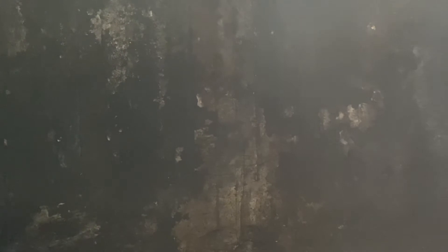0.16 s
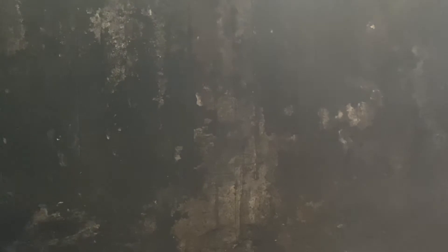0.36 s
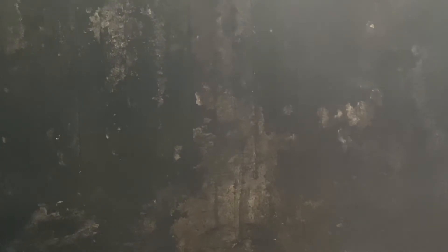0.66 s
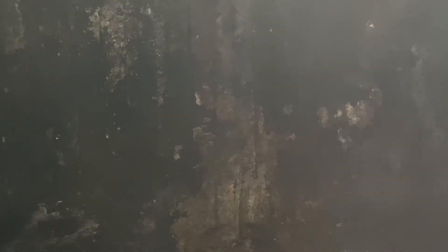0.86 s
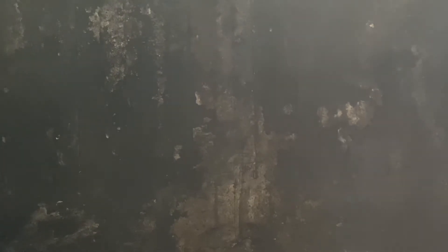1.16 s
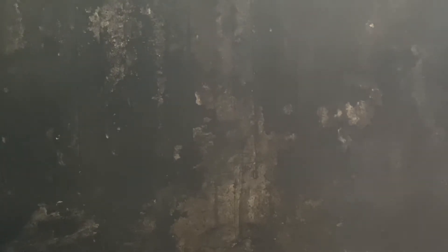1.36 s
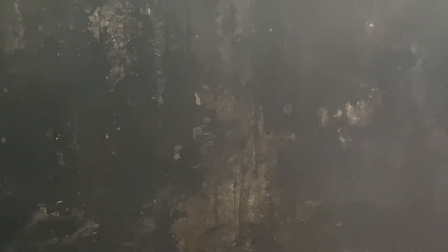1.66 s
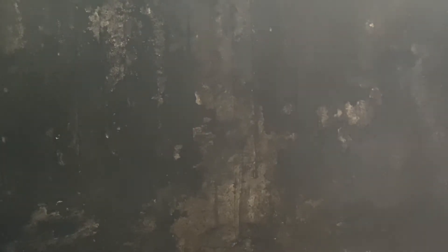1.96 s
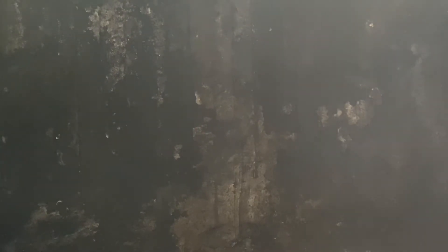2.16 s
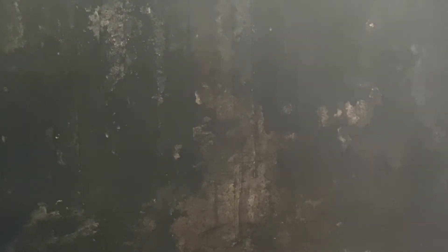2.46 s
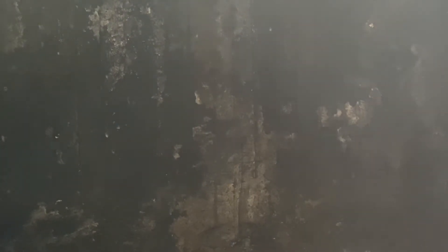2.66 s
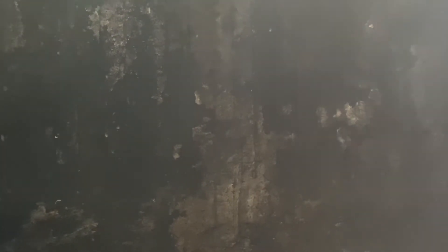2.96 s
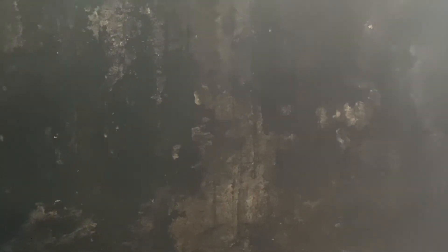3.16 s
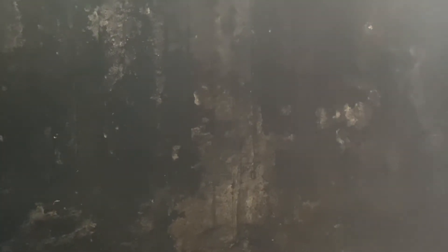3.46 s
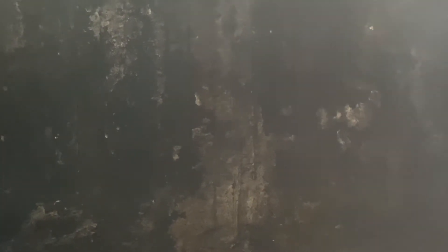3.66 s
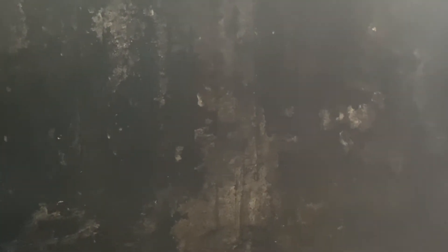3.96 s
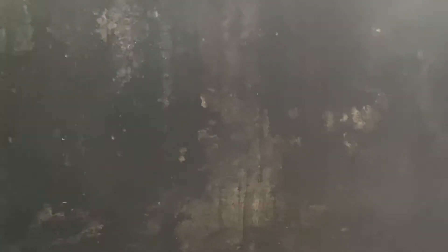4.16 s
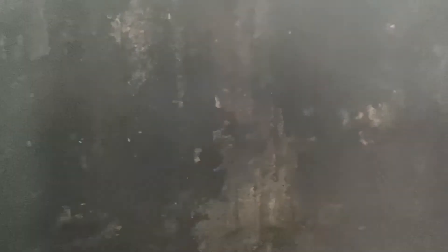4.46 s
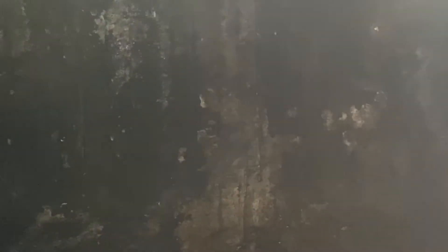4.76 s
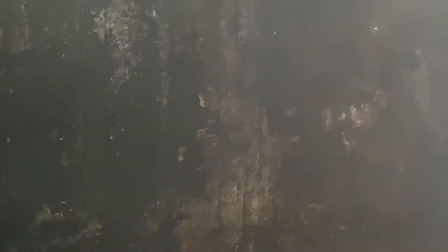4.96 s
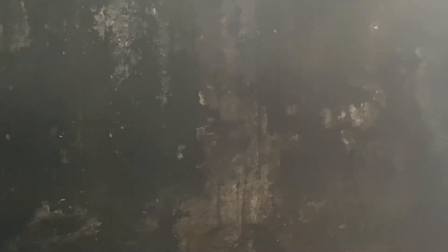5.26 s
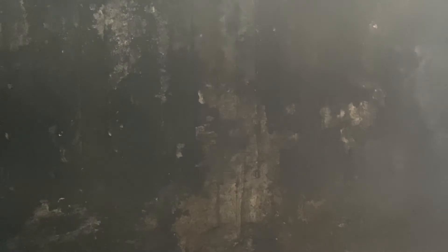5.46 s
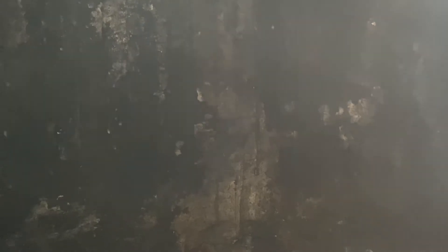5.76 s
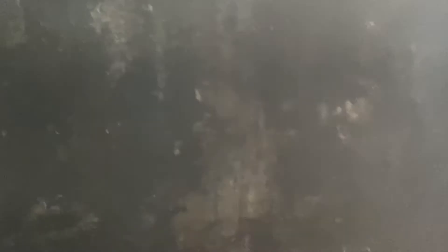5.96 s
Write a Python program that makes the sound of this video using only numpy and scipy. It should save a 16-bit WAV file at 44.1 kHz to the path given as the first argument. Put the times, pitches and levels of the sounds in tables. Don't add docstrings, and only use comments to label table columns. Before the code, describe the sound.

Inside a rolling subway car, a steady low rumble with soft hiss and faint motor whine, broken by one hard, loud double-bouncing knock on glass.

```python
import sys
import numpy as np
from scipy import signal
from scipy.fft import rfft, irfft
from scipy.io import wavfile

SR = 44100
rng = np.random.default_rng(int(sys.argv[2]) if len(sys.argv) > 2 else 0)


def master(y):
    cut = np.clip(np.atleast_2d(y).T, -1, 1)
    pcm = np.round(cut * 32767)
    wavfile.write(sys.argv[1], SR, pcm.astype(np.int16))


def undo_db(level):
    steps = np.asarray(level, float) / 20
    return 10 ** steps


N = 269890

# f/Hz, likeness/0-1, right leads/rad, left louder/dB
PORTS_HIGH = [(1480, 0.23, -0.13, 2.3), (2210, 0.73, -0.64, 8.9), (2880, 0.8, -0.39, 5.3),
              (4080, 1, -0.55, 6.7), (5930, 0.39, .05, 6.1), (7050, 1, 0.15, 0.55),
              (16000, 0.84, -0.15, .01)]


def at_hz(points, hz):
    at, *columns = np.transpose(points)
    return [np.interp(np.log(hz + 1), np.log(at), column) for column in columns]


def right_port(ports, hz):
    alike, lead, left_db = at_hz(ports, hz)
    lag_s, lag_from_hz = 0.00025, 7030
    lead = lead + 2 * np.pi * lag_s * np.maximum(hz - lag_from_hz, 0)
    return np.clip(alike, 0, 1), np.exp(1j * lead) * undo_db(-left_db)


def rms_one(x):
    return x / np.sqrt(np.mean(x ** 2) + 1e-20)


def drift(rate_hz):
    hop = 40
    r = np.exp(-2 * np.pi * rate_hz * hop / SR)
    settle = 2000
    noise = rng.standard_normal(N // hop + settle + 2)
    slow = signal.lfilter([1], [1, -2 * r, r * r], noise)[settle:]
    return np.interp(np.arange(N) / hop, np.arange(len(slow)), rms_one(slow))


def ring(x, hz, r):
    w = 2 * np.pi * hz / SR
    return signal.lfilter([0, np.sin(w)], [1, -2 * r * np.cos(w), r * r], x + 1e-18)


def port_noise(spectrum, ports, low_hz, high_hz):
    hz = np.arange(N // 2 + 1) * SR / N
    shared, own = rfft(rng.standard_normal((2, N)))
    alike, turn = right_port(ports, hz)
    right = (alike * shared + np.sqrt(1 - alike ** 2) * own) * turn
    in_band = (hz >= low_hz) * (hz < high_hz)
    colour = undo_db(at_hz(spectrum, hz)[0]) * in_band
    return rms_one(irfft(colour * np.array([shared, right]), N))


def nearness():
    swing_from_s, nearest_s, leaves_s, clear_s = 4.1, 4.25, 4.62, 4.75
    return np.interp(np.arange(N) / SR, [swing_from_s, nearest_s, leaves_s, clear_s], [0, 1, 1, 0])


def rumble(near):
    # f/Hz, density/dB per Hz
    rolling = [(24, -20.6), (34, -31), (45, -8), (65, -7), (110, -0.5), (200, -1.5), (330, -1.5), (380, -4),
               (480, -4), (540, -8), (680, -5), (800, -11.5), (1100, -11), (1500, -15)]
    # f/Hz, likeness/0-1, right leads/rad, left louder/dB
    ports_low = [(60, 1, .1, 3.5), (202, 0.86, 0.078, -0.9), (335, 0.78, 0.18, 3), (440, 0.61, 1.9, 3),
                 (623, 0.1, 2.5, 2.5), (770, 0.47, 2.74, -0.2), (1010, 0, 2.5, 0.5),
                 (1370, 0.73, 1.72, 1.5)]
    level_db, shade_db, swell_db = -24, 1.5, 1.0
    level = undo_db(level_db - shade_db * near + swell_db * drift(1.7))
    return level * port_noise(rolling, ports_low, 12, 1500)


def hiss(near):
    # f/Hz, density/dB per Hz
    airy = [(1500, -0.5), (1900, 0.7), (2150, -1), (2450, -0.2), (3000, -5.5), (3700, -7.5), (4200, -14.5),
            (4900, -14.5), (5600, -20.5), (7000, -26), (9000, -35.5), (11500, -39.5), (13300, -54),
            (15100, -53)]
    level_db, swell_db, top_hz = -34, 0.42, 15150
    shade_db = np.outer([3, 1.5], near)
    level = undo_db(level_db - shade_db + swell_db * drift(5.2))
    return level * port_noise(airy, PORTS_HIGH, 1500, top_hz)


def body():
    # f/Hz, width/Hz, left level/dB, right level/dB
    resonances = [(68.2, 9.7, -33, -39), (110.3, 34, -34.5, -36.5), (166, 7.6, -36, -38),
                  (221.2, 8.2, -37, -38), (282.5, 17, -38, -42), (335.9, 19.8, -31, -37),
                  (455, 15.4, -37, -53), (600, 61, -43.5, -48.5), (869, 69, -47.5, -47),
                  (903, 16, -48, -42), (2470, 4.2, -76, -74), (2744, 25, -55, -54)]
    axle_hz, axle_db = 34, -40.5
    axle = undo_db(axle_db) * np.sqrt(2) * np.sin(2 * np.pi * axle_hz * np.arange(N) / SR)
    out = axle * undo_db([[1.0], [-1.0]])
    for hz, width, left_db, right_db in resonances:
        r = np.exp(-np.pi * width / SR)
        rung = ring(ring(rng.standard_normal(N), hz, r), hz, r)
        out = out + undo_db([[left_db], [right_db]]) * rms_one(rung)
    return out


def motors(waver_db, wander_rad):
    orders = (21, 22, 39, 41, 42, 43, 44, 45, 59, 60, 61, 62)
    # left level/dB, right level/dB, right leads/rad
    whine = [(-43, -57, -0.52), (-54, -49, -1.3), (-73, -60, 0.51), (-66, -69, 0.42), (-68, -61.5, .3),
             (-73, -72, -0.76), (-85, -78, -1.5), (-80, -76, .1), (-79, -78, -.4), (-81, -77, -.2),
             (-73, -68, 0.54), (-79, -79, .01)]
    gear_hz = (4862, 4952, 5134, 5857, 6308, 8110, 15000)
    # left level/dB, right level/dB, right leads/rad
    gears = [(-62, -72, -.7), (-70, -73, 0.073), (-72, -77, .3), (-78, -81, -.1), (-75, -80, -.1),
             (-75, -77, 1.6), (-91, -91, .01)]
    motor_hz = 112.01
    pitches = [k * motor_hz for k in orders] + list(gear_hz)
    out = np.zeros((2, N))
    for hz, (left_db, right_db, lead) in zip(pitches, list(whine) + list(gears)):
        phase = 2 * np.pi * (hz * np.arange(N) / SR + rng.random()) + wander_rad * drift(1.9)
        level = undo_db([[left_db], [right_db]]) * undo_db(waver_db * drift(0.83))
        out += level * np.sqrt(2) * np.sin(phase + [[0], [lead]])
    return out


def jolts():
    # t/s, f/Hz, peak level/dB, length/s
    sways = [
        (2.762, 55, -21, 0.028),
        (3.512, 76.5, -17.5, 0.034),
        (3.546, 60, -18, .04),
        (4.03, 48, -24, 0.066),
        (4.4876, 473, -13, 0.0036),
        (5.938, 58, -12, 0.026),
        (5.967, 45, -22, 0.046),
    ]
    t = np.arange(N) / SR
    out = 0
    for s, hz, db, length in sways:
        bell = np.exp(-((t - s) / length * 2) ** 2)
        out = out + undo_db(db) * bell * np.cos(2 * np.pi * hz * (t - s))
    return out


def bending_waves(lag_s, soft_s):
    knock_s = [
        4.4848,
        4.4894,
        4.5386,
        4.568,
    ]
    knock_db = (-21, 3, -7, -15.5)
    out, age = np.zeros(N), np.arange(1, 4001) / SR
    turns = np.log(age / .00278) / np.log(1.95)
    onset = 1 - np.exp(-(age / soft_s) ** 3)
    fall = np.exp(-(age / .0135) ** 3) + .33 * np.exp(-(age / .034) ** 6)
    wave = onset * fall * np.cos(2 * np.pi * turns)
    for s, db in zip(knock_s, knock_db):
        i = round((s + lag_s) * SR)
        out[i:i + 4000] += undo_db(db) * wave
    return out


def contacts():
    # t/s, peak level/dB, length/ms, dullness/dB per octave
    touches = [
        (4.4912, -20, 0.16, 0),
        (4.4919, -17, 0.12, -2.1),
        (4.495, -39, .5, 6),
        (4.4986, -26, 0.18, 1.0),
        (4.5413, -16.5, .15, .6),
        (4.5525, -46, .3, -1.5),
        (4.568, -37, 0.18, .5),
        (5.908, -46, .2, -4.0),
    ]
    # f/Hz, level/dB, t60/s
    modes = [(1830, 4, 0.0042), (3230, 6, 0.0053), (4820, -1, 0.0076), (5870, -4, 0.003),
             (7230, 1.5, 0.003), (8500, -2.5, 0.0042), (11200, -10, 0.0018), (14400, -15, .002)]
    left = np.zeros(N)
    grits = rng.standard_normal((len(touches), 400))
    for (s, db, length_ms, dull_db), grit in zip(touches, grits):
        i = round(s * SR)
        fade = np.exp(-(np.arange(400) / (length_ms * SR / 500)) ** 2)
        for k, (hz, mode_db, t60) in enumerate(modes):
            gain = (-1) ** k * undo_db(db + mode_db - dull_db * np.log2(hz / 3300))
            rung = ring(fade * grit, hz, undo_db(-60 / (t60 * SR)))
            left[i:i + 400] += gain * rung / np.abs(rung).max()
    left = signal.sosfilt(signal.butter(6, 15300, fs=SR, output="sos"), left)
    turn = right_port(PORTS_HIGH, np.arange(N // 2 + 1) * SR / N)[1]
    return np.array([left, irfft(rfft(left) * turn, N)])


def slap():
    # t/s, f/Hz
    slap_at = [
        (4.4914, 850),
        (4.5402, 650),
    ]
    # peak level/dB, t60/s
    slap_fall = [(3, 0.0046), (-3, 0.0066)]
    out = 0
    for (s, hz), (db, t60) in zip(slap_at, slap_fall):
        age = np.maximum(np.arange(N) / SR - s, 0)
        out = out - np.sin(2 * np.pi * hz * age) * undo_db(db - 60 * np.minimum(age / t60, 4))
    return out * undo_db([[0], [-8.0]])


def scene():
    near = nearness()
    ride = rumble(near) + hiss(near) + body() + motors(waver_db=1.0, wander_rad=0.99)
    left_wave = bending_waves(lag_s=0, soft_s=0.0046)
    right_wave = bending_waves(lag_s=0.00038, soft_s=0.0057)
    return ride + jolts() + np.array([left_wave, right_wave]) + contacts() + slap()


def band_limit(x):
    return signal.sosfilt(signal.butter(12, 16470, fs=SR, output="sos"), x)


def record(dry):
    peak_db = 20 * np.log10(np.abs(dry).max(axis=0) + 1e-9)
    over_db = np.maximum(peak_db + 5.5, 0) * 0.83
    climb = 42.0 * np.arange(N) / SR
    held = np.maximum.accumulate(over_db + climb) - climb
    smooth = np.exp(-1 / (0.011 * SR))
    ducked = dry * undo_db(-signal.lfilter([1 - smooth], [1, -smooth], held))
    rounded = ducked / (1 + (ducked / .93) ** 4) ** .25
    edges = np.clip(np.minimum(np.arange(N), N - np.arange(N)) / 130, 0, 1)
    return band_limit(rounded * edges)


dry = scene()
out = record(dry)
master(out)
```